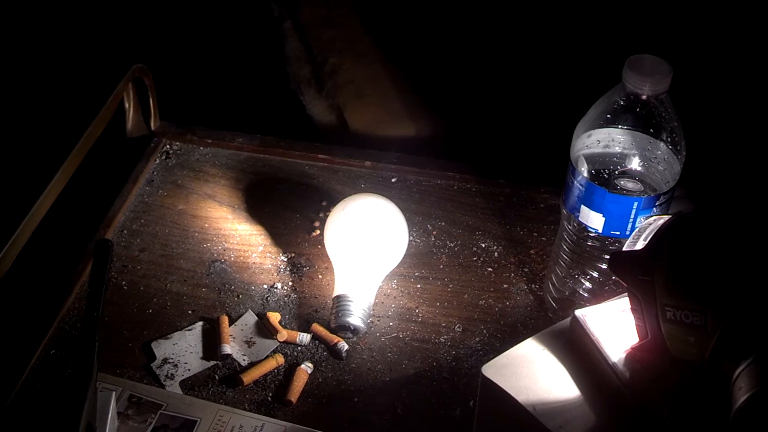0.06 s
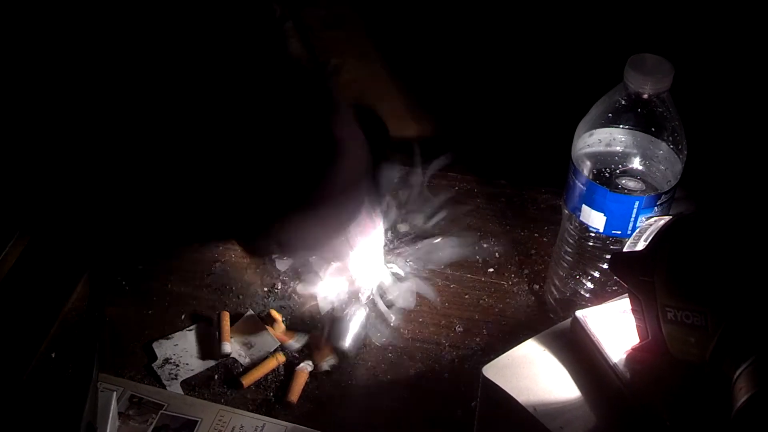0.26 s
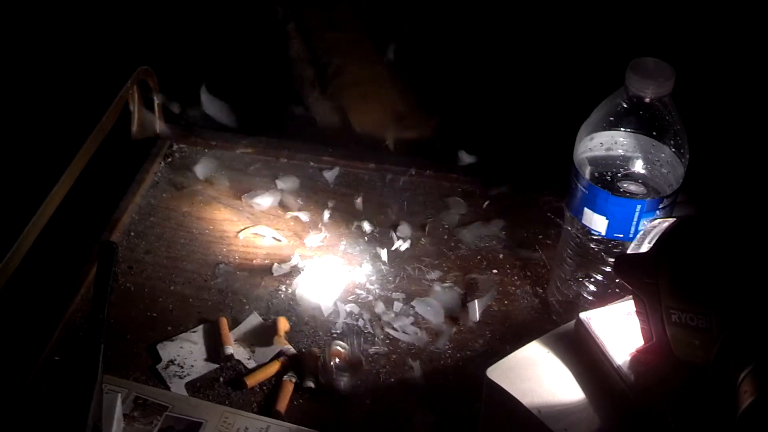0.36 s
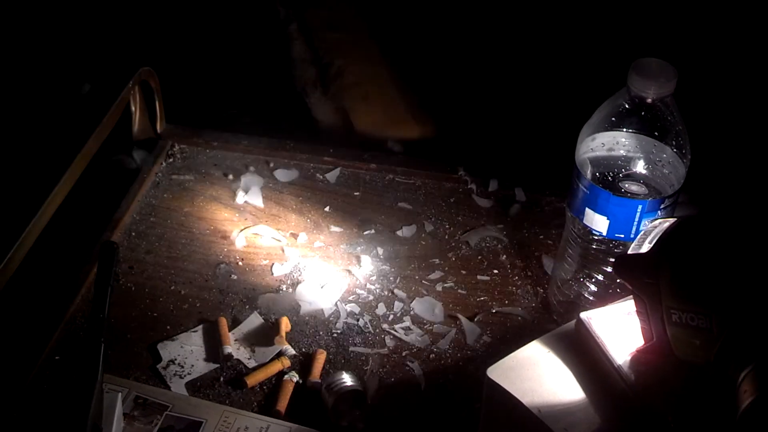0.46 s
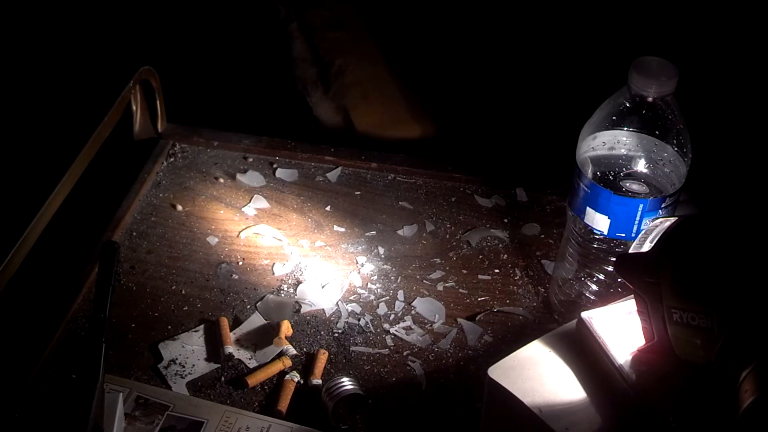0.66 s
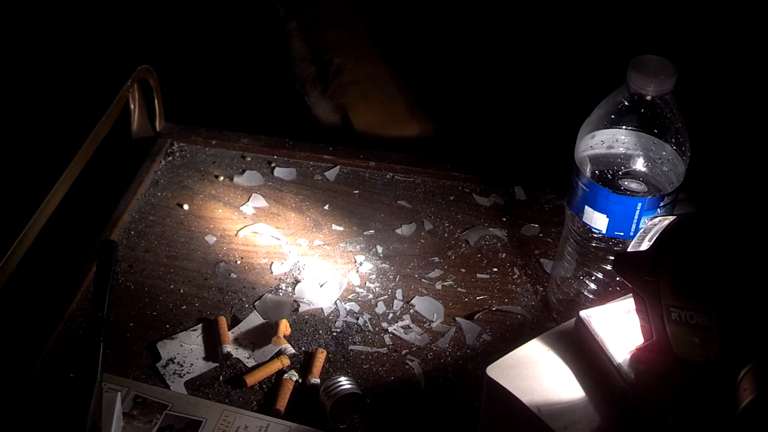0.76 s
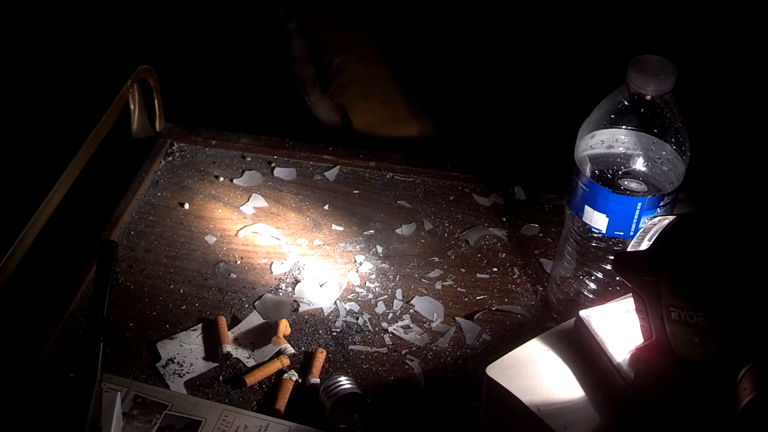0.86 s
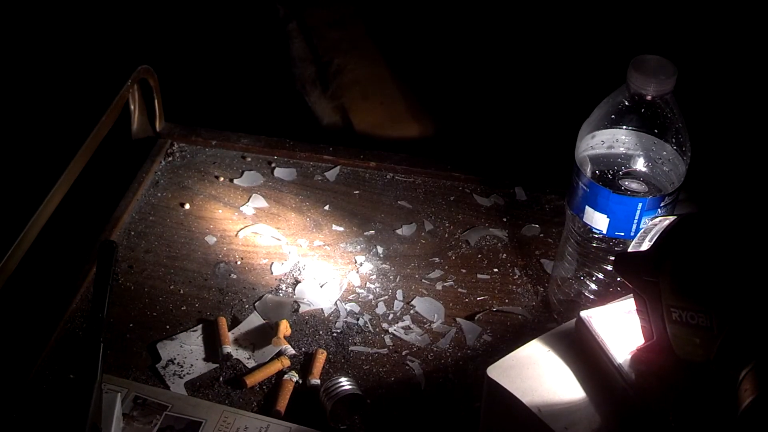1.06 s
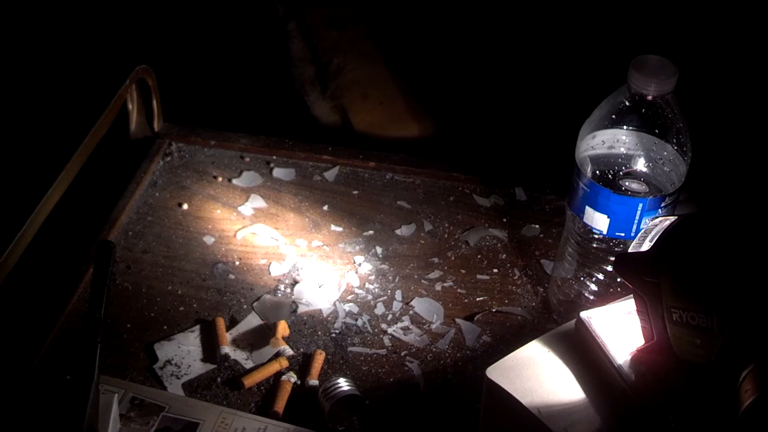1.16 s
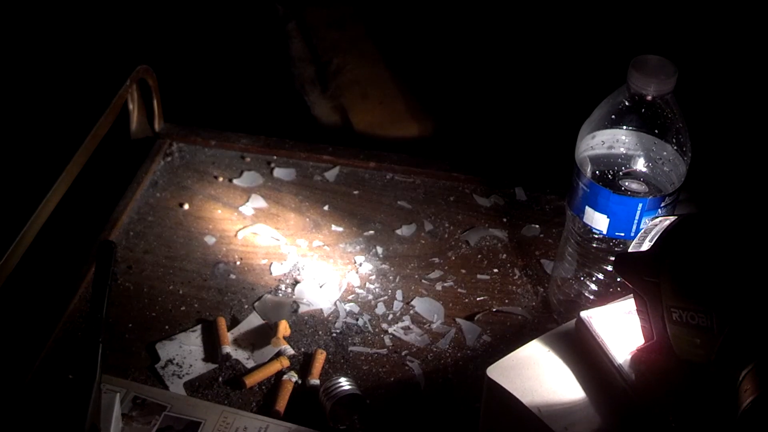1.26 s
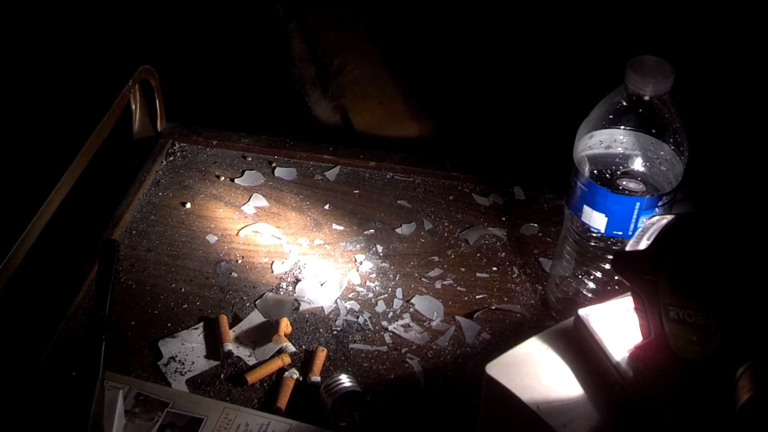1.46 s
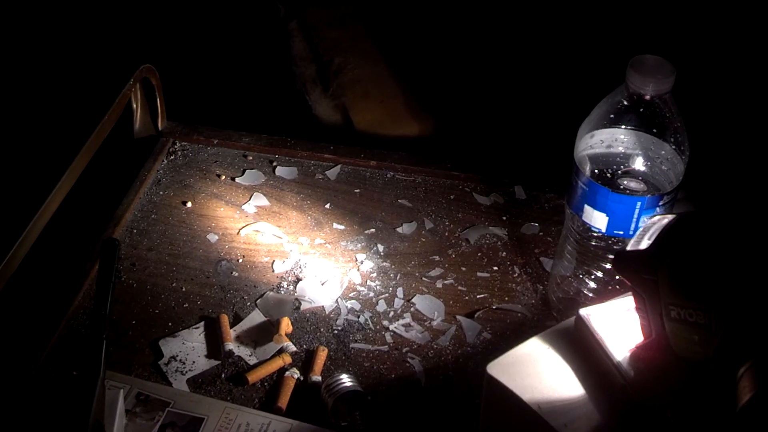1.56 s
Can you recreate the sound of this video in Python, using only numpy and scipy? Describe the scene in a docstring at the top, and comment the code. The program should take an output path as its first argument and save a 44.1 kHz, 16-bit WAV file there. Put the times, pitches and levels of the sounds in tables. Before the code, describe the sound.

A light bulb shatters with a loud, sharp pop and a brief knock from the wooden table beneath. Glass splinters spray, then larger pieces clink and settle in a small room. A soft air rumble brushes the microphone near the end.

```python
"""A lit bulb is smashed on a wooden table in a small room: a tick, a crack, the pop of the bursting globe.
The table booms and splinters spray; larger pieces land, chatter and ring while the screw base rolls.
The pop overloads the microphone, whose gain control ducks the room noise.
Late on, air buffets the microphone's two ports."""
import sys
import numpy as np
from scipy import signal
from scipy.fft import rfft, irfft
from scipy.io import wavfile

SR = 44100
rng = np.random.default_rng(int(sys.argv[2]) if len(sys.argv) > 2 else 0)


def master(y):
    """Save y as 16-bit WAV."""
    cut = np.clip(np.atleast_2d(y).T, -1, 1)
    pcm = np.round(cut * 32767)  # scale
    wavfile.write(sys.argv[1], SR, pcm.astype(np.int16))


N = 70560
TIME_S = np.arange(N) / SR
BIN_HZ = np.arange(N + 1) * SR / (2 * N)
POP_S = .2325


def amp(db):
    """Decibels to gain."""
    return 10 ** (np.asarray(db) / 20)


def unit(x):
    """Scale to rms 1."""
    return x / np.sqrt(np.mean(x ** 2))


def contour(points):
    """EQ curve: gain per spectral bin from (freq_hz, level_db) points."""
    hz, db = np.array(points).T
    return amp(np.interp(np.log(BIN_HZ + 1), np.log(hz), db))


def fader(points):
    """Level ride: gain per sample from (time_s, level_db) points."""
    return amp(np.interp(TIME_S, *np.array(points).T))


def shape(x, gain):
    """Filter by a gain per spectral bin."""
    return irfft(rfft(x, 2 * N) * gain)[..., :N]


def noise(gain, width):
    """Coloured stereo noise; width is side over mid."""
    mid, side = (unit(shape(rng.standard_normal(N), gain)) for _ in range(2))
    return (mid + width * side * np.array([[1], [-1]])) / np.hypot(1, width)


def fade(start_s, t60_s, rise_s=.0002):
    """Quick rise and exponential decay."""
    age = np.maximum(TIME_S - start_s, 0)
    return (1 - np.exp(-age / rise_s)) * np.exp(-np.log(1000) * age / t60_s)


def ring(start_s, hz, t60_s, rise_s=.0002):
    """One decaying mode."""
    return fade(start_s, t60_s, rise_s) * np.sin(2 * np.pi * hz * (TIME_S - start_s))


def pan(db):
    """Stereo gains with left db above right."""
    return amp(np.array([[db], [-db]]) / 2)


def grit(colour, contacts_per_s=1400):
    """Dense contacts of uneven size."""
    clicks = (rng.random(N) < contacts_per_s / SR) * rng.choice([-1, 1], N)
    sizes = amp(3 * rng.standard_normal(N))
    return unit(shape(clicks * sizes, contour(colour)))


def room_tone():
    """A steady, dark hush under the whole scene."""
    # room noise spectrum: freq_hz, level_db
    colour = [(30, -19), (80, -9.5), (160, -1), (270, 4), (500, -3), (1000, -11), (2000, -24.5),
              (4000, -25.5), (8000, -31), (15000, -35)]
    return amp(-41.5) * noise(contour(colour), width=.22)


def cracks():
    """The globe gives way in three bright snaps, each louder than the last."""
    # cracks in the globe: start_s, level_db, t60_s
    snaps = [(.2073, -29, .02), (.2301, -17, .012), (.2329, -8, .009)]
    # crack spectrum: freq_hz, level_db
    colour = [(300, 1), (2000, 4), (4500, 0.5), (7000, -3), (10000, -6.5), (15000, -14)]
    return noise(contour(colour), width=.3) * sum(amp(db) * fade(at, t60) for at, db, t60 in snaps)


def pop(width_s=.00036, edge=1.1):
    """One steep swing of pressure from the bursting globe, and its early reflections."""
    # early reflections: delay_s, level_db, pan_db
    echoes = [(.0026, -13, -11), (.0042, -15.5, 4.5), (.0093, -13, -7.5), (.0141, -13, -6)]

    def swing(at):
        u = (TIME_S - at) / width_s
        return -np.tanh(edge * u * np.exp((1 - u ** 2) / 2)) * amp(4.5)
    return swing(POP_S) + sum(swing(POP_S + delay) * amp(db) * pan(side) for delay, db, side in echoes)


def table_boom():
    """The blow sets the wooden table ringing."""
    # table modes: pitch_hz, level_db, t60_s
    modes = [(182, -29.5, 0.56), (335.7, -18, .22), (443.5, -20.5, .19), (630, -25.5, .15),
             (800, -21.5, .09), (846, -21, .13), (1022, -24, .17), (1183, -25, .19), (1370, -25.5, .12),
             (1471, -30, .14), (1657, -27, .17)]
    return sum(amp(db) * ring(POP_S, hz, t60, rise_s=.002) for hz, db, t60 in modes)


def burst():
    """The crash of the burst dies away in the room, band by band."""
    # noise bands: centre_hz, level_db, t60_s, width (side over mid)
    bands = [(70, -38, 0.076, 1.2), (160, -23, .28, 1.2), (350, -21.5, .25, 0.26), (820, -16.5, .19, .1),
             (1526, -26, .17, .12), (2660, -30.5, .16, .15), (3700, -22.5, .19, 0.16),
             (6500, -27.5, .23, .3), (10000, -31, 0.25, .3), (14000, -30, 0.27, .4)]
    log_centres = np.log([30] + [row[0] for row in bands])  # silent at 30 Hz and below
    out = 0
    for solo, (_, db, t60, width) in zip(np.eye(len(log_centres))[1:], bands):
        band = np.sqrt(np.interp(np.log(BIN_HZ + 1), log_centres, solo))  # equal-power crossovers
        out += amp(db) * noise(band, width) * fade(POP_S, t60, rise_s=.0012)
    return out


def splinters(count=130, spread_s=.42, falloff_db_per_s=40.5):
    """A fading spray of tiny ringing splinters and glass dust, with a few clear ticks."""
    # small splinters landing: start_s, level_db, t60_s
    landings = [(.353, -24, .015), (.422, -27.5, .015), (.4425, -35.5, .03), (.468, -32.5, .03),
                (.488, -30.5, .015), (.5545, -19.5, .016), (.5995, -21, .02), (.607, -32, .03),
                (.654, -27.5, .03), (.901, -32.5, .09), (1.0685, -34, 0.019)]
    # spectrum of ticks and dust: freq_hz, level_db
    colour = [(100, -32.5), (500, -15), (2500, -11.5), (3900, -1), (6000, -3.5), (9000, -7), (15000, -19.5)]
    dust = amp(-34) * grit(colour) * fade(POP_S, t60_s=1.1, rise_s=.06)
    tick_envelope = sum(amp(db) * fade(at, t60, rise_s=.00097) for at, db, t60 in landings)
    ticks = noise(contour(colour), width=.35) * tick_envelope
    spray = 0
    for when, pitch, size, place in rng.random((count, 4)):
        flight_s = spread_s * when
        db = -42.5 - falloff_db_per_s * flight_s + 12 * (size - .5)
        ping = ring(POP_S + flight_s, 3500 + 11500 * pitch, t60_s=.07)
        spray += amp(db) * pan(6 * (place - .5)) * ping
    return dust + ticks + spray


def room_reverb(x):
    """Add the short diffuse tail of a small room."""
    tail = noise(np.ones(N + 1), width=.2) * fade(.003, t60_s=.22)
    return x + amp(-4) * shape(x, rfft(unit(tail) / np.sqrt(N), 2 * N))


def piece_notes(pieces):
    """Each piece sings its own beating note, damped ever faster as it settles flat."""
    rise_s = .004
    out = 0
    for at, _, hz, db, length_s, side in pieces:
        age = np.maximum(TIME_S - at, 0)
        beat_hz = 70 * rng.uniform(.82, 1.8)
        tone = np.sin(2 * np.pi * hz * age) + amp(-7.5) * np.sin(2 * np.pi * (hz + beat_hz) * age)
        envelope = (1 - np.exp(-age / rise_s)) * np.exp(-np.log(1000) * (age / length_s) ** 2)
        out += pan(side) * amp(db) * tone * envelope
    return out


def piece_clatter(pieces, rise_s=.002, detune=.0046):
    """Each piece chatters on the wood and sounds shared and stray partials."""
    # glass partials common to all pieces: pitch_hz, level_db, t60_s
    partials = [(5087, -12, .25), (6700, -7.5, .15), (7930, -10.5, 0.13), (8796, -13, 0.096),
                (10080, -11, 0.21), (11100, -15.5, 0.064), (12100, -6, .12), (12333, -8, .12),
                (14820, -3, 0.094)]
    # chatter spectrum: freq_hz, level_db
    colour = [(100, -34.5), (600, -22), (2500, -14), (4000, -3), (7000, 3.5), (10000, -2), (15000, -4)]
    out = 0
    for at, clatter_db, _, _, _, side in pieces:
        shared = 0
        for hz, db, t60 in partials:
            gain = amp(db + 3 * rng.standard_normal())
            shared += gain * ring(at, hz * (1 + detune * rng.standard_normal()), t60, rise_s)
        stray = sum(ring(at, hz, t60_s=.075, rise_s=rise_s) for hz in rng.uniform(4300, 15600, 9))
        chatter = grit(colour) * fade(at, t60_s=.086, rise_s=rise_s)
        out += pan(side) * amp(clatter_db) * (chatter + amp(-4.5) * shared + amp(-11) * stray)
    return out


def rolling_base():
    """The metal screw base rumbles faintly across the table."""
    # level of the roll: time_s, level_db
    ride = [(.3, -54.5), (.4, -40), (.5, -49.5), (.87, -47.5), (.92, -43), (0.959, -43), (0.998, -40.5),
            (1.04, -52), (1.3, -54), (1.381, -46.5), (1.43, -55.5), (1.6, -50)]
    # rolling spectrum: freq_hz, level_db
    colour = [(100, -16), (280, -1.5), (600, -8), (1250, -4.5), (1850, -8.5), (3000, -13.5), (4500, -12.5),
              (9000, -22.5)]
    return fader(ride) * grit(colour)


def draught():
    """Air buffets the microphone: a low rumble, mostly out of phase at the two ports."""
    # gusts on the ports: time_s, level_db
    gusts = [(1.18, -60.5), (1.27, -27), (1.33, -32), (1.378, -22.5), (1.41, -37), (1.44, -30),
             (1.465, -18.5), (1.51, -31), (1.6, -33.5)]
    # buffeting spectrum: freq_hz, level_db
    colour = [(30, -2.5), (70, 3.5), (130, 4), (300, -7), (500, -22.5), (1200, -38), (4000, -58)]
    common, opposed = noise(contour(colour), width=1)
    return fader(gusts) * (.32 * common + opposed * np.array([[1], [-1]]))


def scene():
    """The smash and the falling glass over the room noise, then the draught."""
    # larger pieces landing: start_s, clatter_db, note_hz, note_db, note_length_s, pan_db
    pieces = [(.236, -45.5, 3682, -26, 0.071, -3.5), (.252, -46, 8861, -33, .13, 4.5),
              (.375, -42.5, 6121, -40, 0.12, 1), (0.382, -42.5, 12200, -45, .22, -3),
              (.440, -41, 8409, -46, 0.15, -1.5), (0.463, -40.5, 12700, -42.5, 0.16, -10),
              (.695, -53, 4200, -47, 0.16, -10), (.777, -28.5, 15385, -36, .1, -1),
              (.789, -32.5, 7946, -23.5, 0.089, -4), (.848, -28, 14847, -32, .1, 0),
              (.852, -37, 6498, -31, 0.22, -8), (0.904, -41, 11375, -38.5, 0.074, 0),
              (.955, -44.5, 5060, -47, 0.24, -6), (1.004, -35, 6654, -38, 0.12, 8),
              (1.012, -42, 7747, -35, .1, -7.5), (1.068, -36, 10131, -36.5, 0.052, -4.5),
              (1.079, -34.5, 3930, -44.5, 0.18, -3.5), (1.105, -40, 5090, -44.5, .2, -3),
              (1.129, -27.5, 8888, -38, 0.11, -0.5), (1.139, -38.5, 11760, -38.5, 0.081, -4),
              (1.140, -35.5, 6465, -31.5, 0.17, -1), (1.203, -40, 6627, -31, 0.14, -12),
              (1.235, -45.5, 6640, -36.5, 0.083, 24), (1.275, -42, 9050, -44.5, 0.17, 0),
              (1.318, -43, 4204, -46.5, 0.18, -2), (1.365, -43, 8888, -41.5, 0.21, 6),
              (1.38, -39, 4690, -46, 0.13, 0), (1.52, -40.5, 11095, -40.5, 0.1, -1),
              (1.590, -49, 11913, -42, .08, 18)]
    smash = cracks() + pop() + table_boom() + burst()
    notes = piece_notes(pieces)
    debris = splinters() + piece_clatter(pieces) + rolling_base()
    return smash + notes + room_reverb(debris) + room_tone() + draught()


def record(dry):
    """Two spaced ports, low cut, gain control that ducks fast and recovers slowly, clipping, top cut."""
    # phase of the left port behind the right: freq_hz, lag_rad
    port_lag = [(0, 0), (170, .6), (600, .45), (1200, 0), (1900, .8), (2400, 3.14), (2900, 5.3),
                (3620, 6.28), (4600, 8.2), (5300, 8.3), (5500, 10.6), (6600, 12.57), (7300, 13.6),
                (7620, 15.7), (8000, 17.6), (8700, 18.85), (9900, 21.5), (10900, 25.1), (12100, 24.3),
                (15200, 26.5)]
    # balance of the ports: freq_hz, left_over_right_db
    balance = [(50, -0.5), (160, 1.5), (320, -3), (700, 2), (1400, -0.9), (2800, -0.5), (8000, -2),
               (14000, -5)]
    # tone colour, a narrow dip at 2.4 kHz and a slight treble lift: freq_hz, level_db
    colour = [(60, -3), (150, -1.5), (500, -1.5), (1000, 0), (1900, 0.5), (2400, -5.5), (3000, 0.5),
              (3700, 0.5), (4700, 3.5), (6500, 1), (8200, 2.5), (10000, 1), (15000, 0)]
    low_cut_hz, top_cut_hz = 100, 15700
    threshold_db, range_db, attack_s, recovery_db_per_s = -28, 23, .14, 3

    lag_rad = np.interp(BIN_HZ, *np.array(port_lag).T)
    lean = np.sqrt(contour(balance)) * np.exp(-.5j * lag_rad)  # half to each port
    x = shape(dry, contour(colour) * np.array([lean, 1 / lean]))
    x = signal.sosfilt(signal.butter(2, low_cut_hz, "highpass", fs=SR, output="sos"), x)

    peak_db = 20 * np.log10(np.abs(x).max(axis=0) + 1e-9)
    over_db = np.clip(peak_db - threshold_db, 0, range_db)
    recovery_db = recovery_db_per_s * TIME_S
    held_db = np.maximum.accumulate(over_db + recovery_db) - recovery_db  # peak hold, slowly sinking
    step = 1 / (attack_s * SR)
    duck_db = signal.lfilter([step], [1, step - 1], held_db)
    clipped = np.clip(x * amp(-duck_db), -1, 1)
    return signal.sosfilt(signal.ellip(10, .1, 80, top_cut_hz, fs=SR, output="sos"), clipped)


dry = scene()
out = record(dry)
master(out)
```